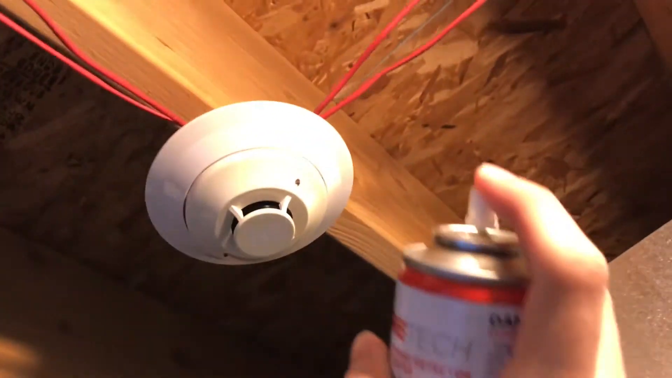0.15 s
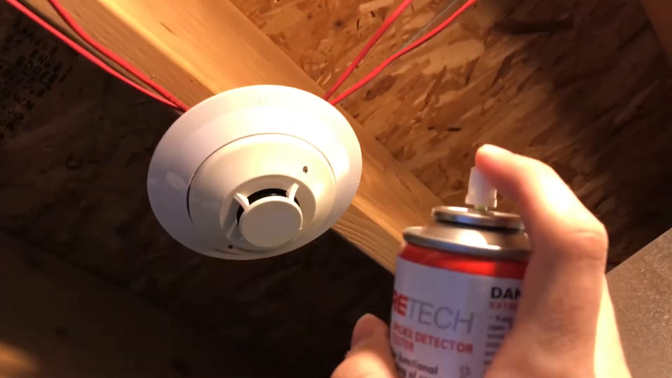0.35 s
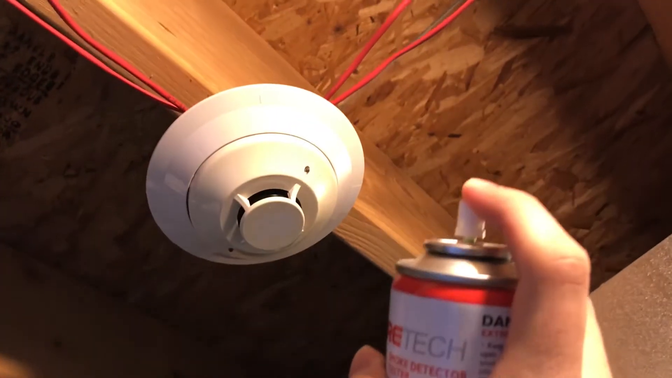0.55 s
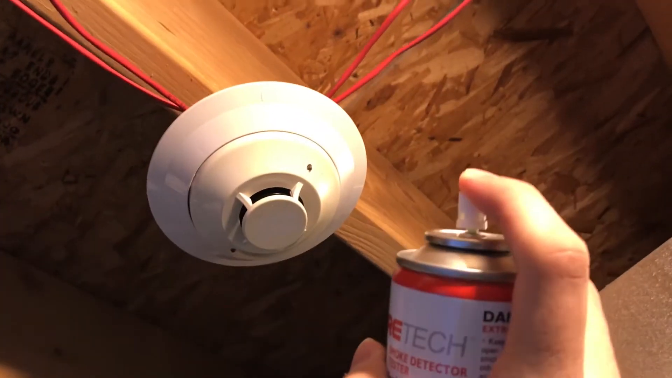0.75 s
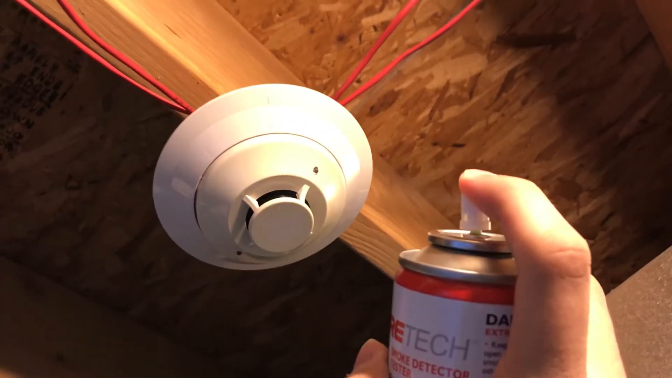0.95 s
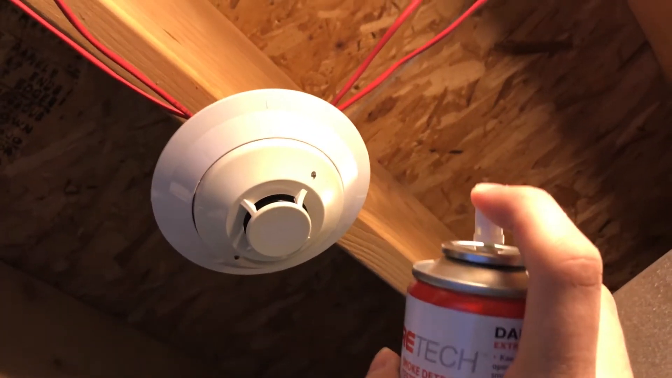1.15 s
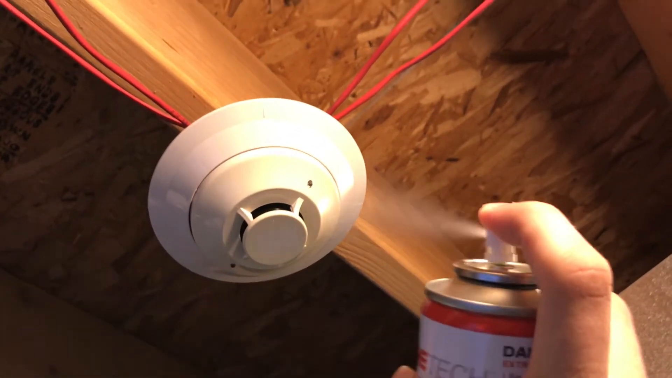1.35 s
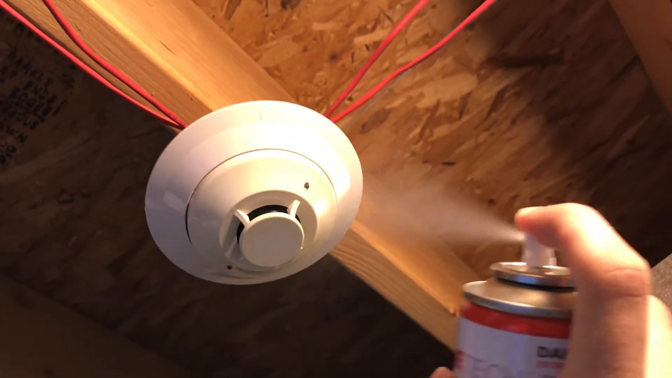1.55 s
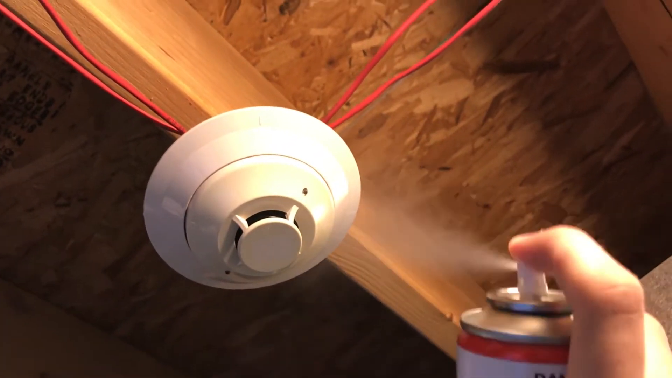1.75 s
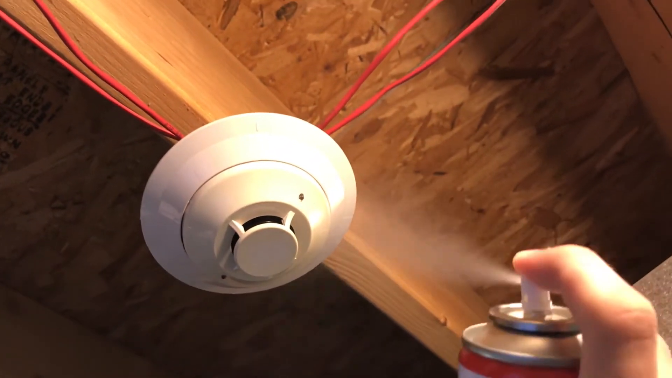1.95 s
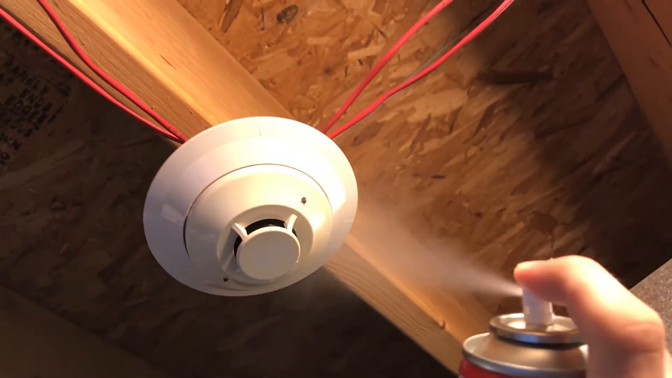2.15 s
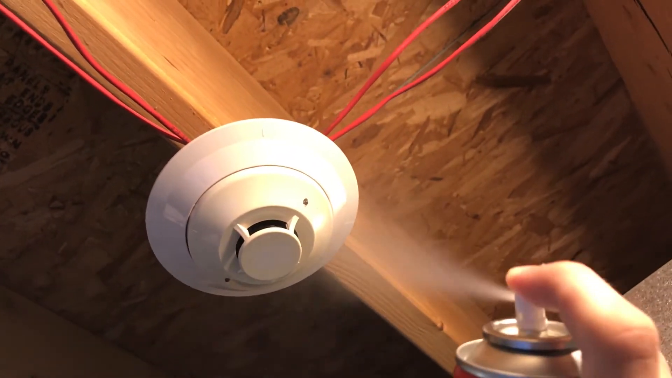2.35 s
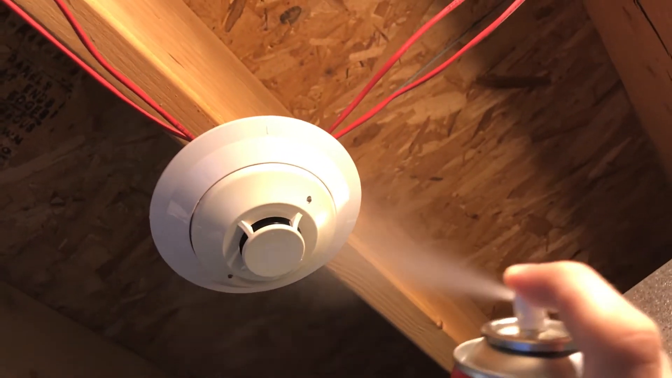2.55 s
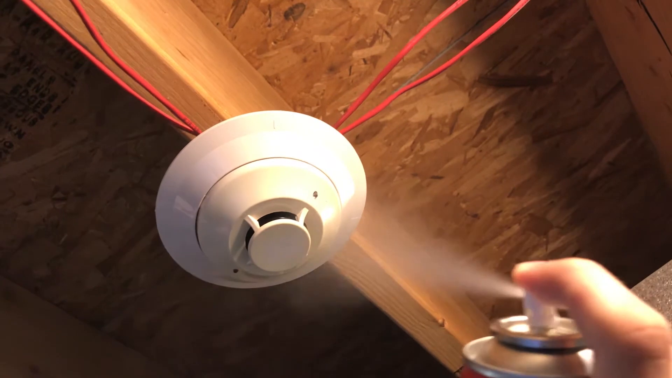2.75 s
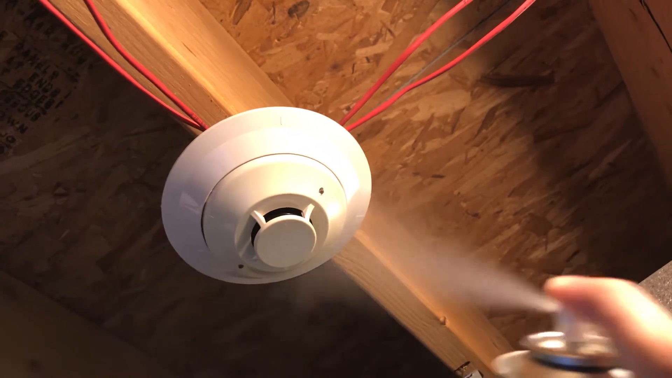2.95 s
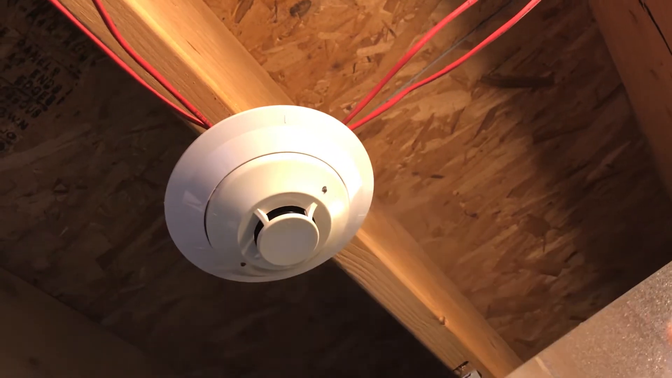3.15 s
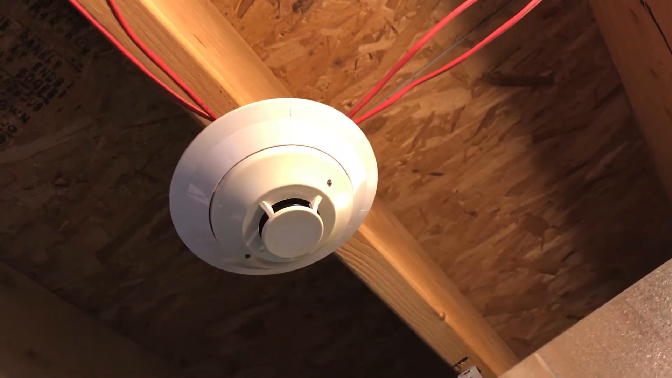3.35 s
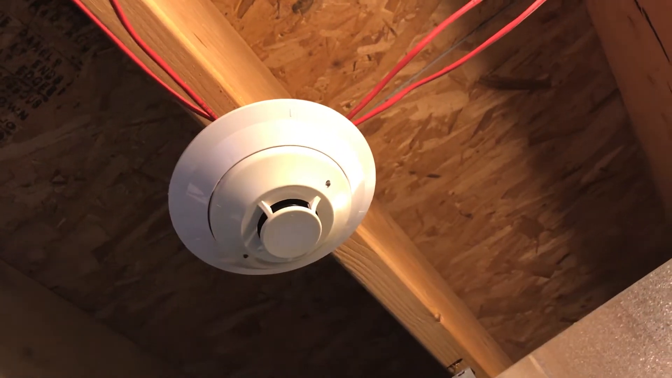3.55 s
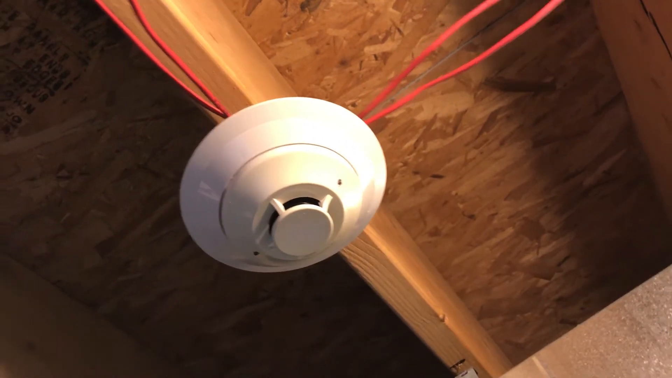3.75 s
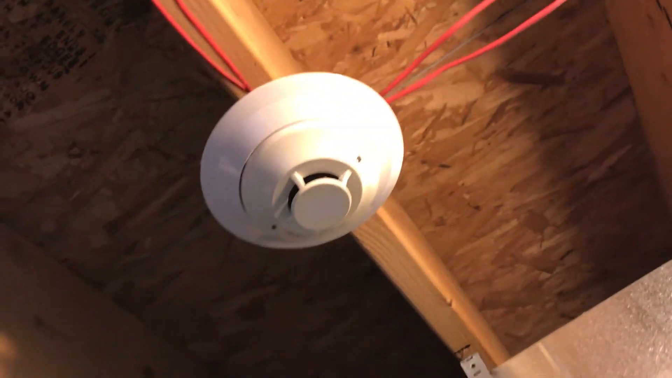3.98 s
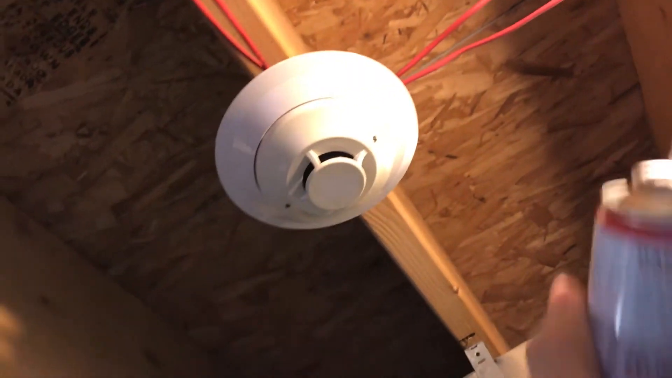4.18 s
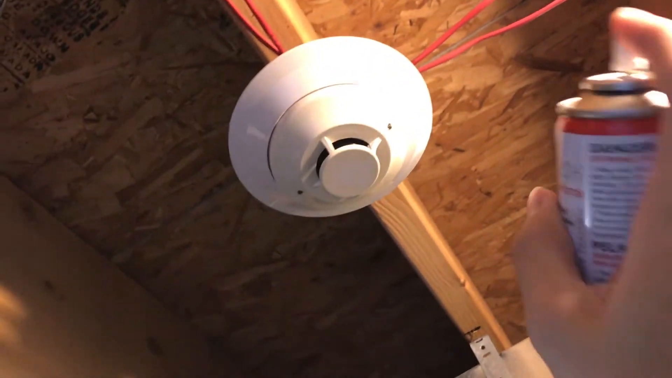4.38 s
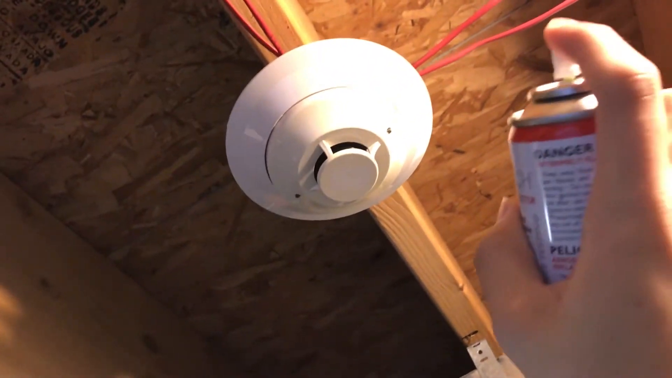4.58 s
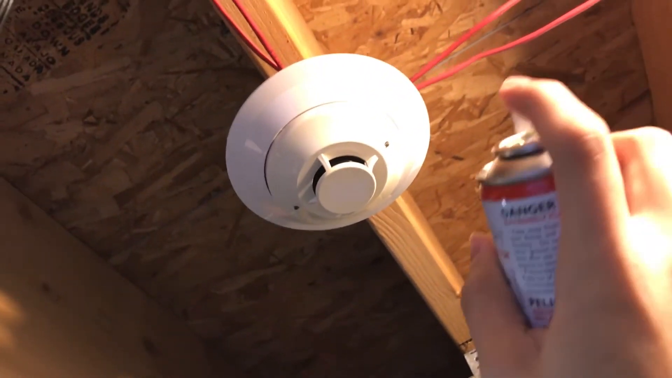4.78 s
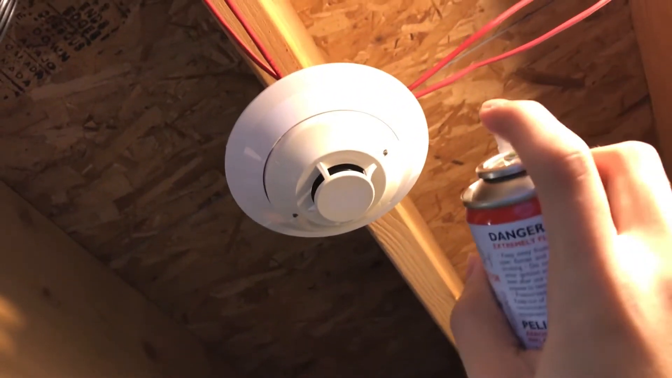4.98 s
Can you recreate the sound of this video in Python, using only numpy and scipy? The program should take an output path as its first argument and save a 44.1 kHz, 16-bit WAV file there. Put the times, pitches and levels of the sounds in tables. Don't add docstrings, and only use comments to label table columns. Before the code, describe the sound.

In a small wooden room, an aerosol can close to the microphone seeps weakly, then hisses firmly and is pumped in quick, even bursts. The spraying stops just after three seconds, leaving a faint rustle and a few light finger ticks on the can. A steady low mains hum, motor drone and soft ventilation continue underneath throughout.

```python
import sys
import numpy as np
from scipy import signal
from scipy.fft import rfft, irfft, next_fast_len
from scipy.io import wavfile
from scipy.ndimage import uniform_filter1d

SR = 44100
rng = np.random.default_rng(int(sys.argv[2]) if len(sys.argv) > 2 else 0)


def boost_factor(decibels):
    exponent = np.asarray(decibels, float) / 20
    return 10 ** exponent


def int16_out(signal):
    q = np.round(np.clip(np.atleast_2d(signal).T, -1, 1) * 32767)
    wavfile.write(sys.argv[1], SR, q.astype(np.int16))


N = 221470

# frequency in Hz, width in Hz, level in dB.
DRONES = [(59.7, 0.41, -54.5), (101.7, 1, -44.5), (320.2, 9.1, -54), (546.6, 9.4, -60.5), (599, 10, -69),
          (713, 15, -64.5), (820, 34, -61)]
# frequency in Hz, density in dB per Hz.
RUMBLE = [(25, -16), (45, -18), (70, -12), (85, -3), (115, -5), (128, 2), (160, -2.5), (190, -13.5),
          (240, -8), (290, -14.5), (340, -11), (420, -18.5), (600, -19.5), (760, -28)]
# frequency in Hz, density in dB per Hz.
AIR = [(450, -25), (760, -10.5), (880, -5.5), (1100, -6), (1170, -9.5), (1580, -9.5), (2260, -14),
       (4830, -23), (7000, -26.5), (7800, -30), (10500, -34), (11600, -32), (13500, -36.5), (16200, -38)]
# frequency in Hz, t60 in seconds.
ROOM_DECAY = [(500, 0.15), (3000, 0.54), (8000, 0.31), (13500, 0.43), (16000, .15)]
# delay in seconds, level in dB.
BOARD_ECHOES = [(.0013, -15), (.0029, -18.5), (.0044, -25.5), (.0067, -20.5), (.0093, -28.5), (0.012, -21)]
# frequency in Hz, density in dB per Hz.
SEEP_COLOUR = [(2500, -11), (4000, 0.5), (6240, -2), (7670, -4.5), (9200, -1), (10500, -7.5), (12100, -1.5),
               (14000, -6), (16200, -8)]
# start in seconds, length in seconds, level in dB, fade in dB per second.
RUSTLES = [(0.07, .17, -67.5, 500), (0.323, .12, -60.5, 400), (3.178, .293, -59, 1200),
           (3.636, 0.014, -61, 140), (3.802, 0.012, -58, 500), (3.844, .095, -68, 120),
           (4.16, .006, -71, 900), (4.478, .005, -65, 500), (4.76, .004, -76, 60)]
# start in seconds, peak in dB, centre in Hz, width in Hz, t60 in seconds.
TICKS = [(3.436, -57, 6000, 4000, .03), (3.5954, -57, 13500, 4000, .01), (3.6406, -52, 6500, 6000, .02),
         (3.8028, -46, 6500, 8000, .012), (3.8095, -44, 8900, 2000, .015), (3.9374, -52, 11600, 2000, .015),
         (3.9374, -54, 6500, 2500, .015), (4.4777, -43, 2800, 600, .04), (4.4777, -55, 8000, 8000, .02),
         (4.7594, -60, 13000, 4000, .04)]
# start in seconds, length in seconds, first Hz, last Hz, level in dB.
SQUEAK = (3.275, .022, 15000, 13600, -65)
# time in seconds, jet level in dB.
SQUEEZES = [
    [(0.83, -75), (0.85, -53), (0.885, -47), (0.94, -44.5), (0.976, -38.5), (1.108, -44.5), (1.26, -34.5),
     (1.306, -43.5), (1.35, -55)],
    [(1.408, -36), (1.448, -25.5), (1.55, -31), (1.652, -26), (1.70, -27.5), (1.734, -32.5), (1.765, -42.5)],
]
# push, let go and back up in seconds, full level in dB, leak left after it in dB.
PUMPS = [(1.773, 1.909, 1.956, -27, -44.5), (1.995, 2.103, 2.16, -27, -34),
         (2.184, 2.304, 2.375, -26.5, -38.5), (2.382, 2.516, 2.562, -26.5, -40),
         (2.584, 2.71, 2.752, -26, -38.5), (2.754, 2.882, 2.934, -26, -47),
         (2.937, 3.043, 3.114, -26.5, -50)]
# frequency in Hz, density in dB per Hz.
FIZZ_SOFT = [(2000, -27), (3000, -12.5), (4270, -11.5), (6000, -5), (7030, -5), (7590, -9), (8780, -8),
             (10300, -10), (11600, -1), (13000, -1.5), (13700, -7), (14300, 3), (16200, -0.5)]
# frequency in Hz, density in dB per Hz.
FIZZ_FULL = [(2000, -27), (3000, -7.5), (4400, -9.5), (5330, -3), (6200, -2), (7640, -6.5), (8840, -4.5),
             (9700, -8.5), (10400, -12.5), (11300, -4.5), (13500, -4), (14200, -1), (15000, 3),
             (16200, -3.5)]
# frequency in Hz, density in dB per Hz.
ROAR = [(260, -33), (450, -7.5), (513, -8), (613, -8.5), (774, -10.5), (1200, -2), (1830, -5), (2120, -2),
        (2490, -4.5), (2810, 0), (4200, -6.5), (5460, -19), (9240, -120)]
# frequency in Hz, width in Hz, level in dB.
WHISTLES = [(8600, 300, -13), (9600, 200, -16), (11800, 400, -15), (12800, 300, -14), (14400, 300, -16)]
# centre in seconds, lower Hz, upper Hz.
SIDE_BURSTS = [(.032, 5120, 8310), (.032, 12360, 14450), (.241, 4610, 5750), (.7982, 8230, 9650),
               (2.2611, 6830, 9690), (2.4701, 10940, 12450), (2.8648, 4110, 5120), (2.8648, 7520, 10360),
               (3.9097, 12300, 13800), (3.9561, 10230, 14530), (4.1187, 14380, 15750), (4.2812, 5620, 6910),
               (4.3973, 10960, 12490), (4.8153, 4690, 5750), (4.8385, 6830, 8350)]

SOFT_DB, FULL_DB = -38.5, -27


def evened(x):
    return x / np.sqrt(np.mean(x ** 2) + 1e-20)


def read(points, hz):
    f, value = np.transpose(points)
    return np.interp(np.log(hz + 1), np.log(f + 1), value)


def band(x, lo_hz, hi_hz):
    size = next_fast_len(len(x))
    hz = np.fft.rfftfreq(size, 1 / SR)
    return irfft(rfft(x, size) * ((hz >= lo_hz) & (hz < hi_hz)), size)[:len(x)]


def hiss(colour, patchy_db=1.0, size=512):
    hz = np.fft.rfftfreq(size, 1 / SR)
    frames = 4 * N // size + 8
    a, b, patches = rng.standard_normal((3, frames, len(hz)))
    patches = uniform_filter1d(patches, size=14, axis=0)
    patches = evened(uniform_filter1d(patches, size=6, axis=1))
    inside = (hz >= colour[0][0]) & (hz <= colour[-1][0])
    z = (a + 1j * b) * boost_factor(read(colour, hz) + patchy_db * patches) * inside
    return evened(signal.istft(z.T, nperseg=size, noverlap=3 * size // 4)[1][:N])


def fuzzy_tone(hz, width):
    r = np.exp(-np.pi * width / SR)
    noise = [1, 1j] @ rng.standard_normal((2, N + SR))
    slow = signal.lfilter([1], np.convolve([1, -r], [1, -r]), noise)[SR:]
    return evened((slow * np.exp(2j * np.pi * hz * np.arange(N) / SR)).real)


def mains_hum(t):
    level_db = -33 + 0.66 * fuzzy_tone(0, 2.3)
    return np.sqrt(2) * boost_factor(level_db) * np.sin(2 * np.pi * 120.06 * t)


def motor(t):
    drones = sum(boost_factor(db) * fuzzy_tone(hz, width) for hz, width, db in DRONES)
    whine_db = -55.5 + 1.6 * (t - t[-1])
    phase = 2 * np.pi * 855 * t + 0.8 * fuzzy_tone(0, 1.5)
    return drones + np.sqrt(2) * boost_factor(whine_db) * np.sin(phase)


def ventilation():
    rumble = boost_factor(-39) * hiss(RUMBLE, patchy_db=1.5, size=4096)
    return rumble + boost_factor(-51) * hiss(AIR, size=1024)


def room(x):
    taps = np.zeros(SR // 2)
    at = np.arange(200, SR // 2 - 20, 20)
    taps[at + rng.integers(0, 20, len(at))] = rng.choice([-1., 1.], len(at))
    hz, t, z = signal.stft(taps, SR, nperseg=256)
    t60 = np.maximum(read(ROOM_DECAY, hz), 0.05)
    tail = signal.istft(z * boost_factor(-60 * t / t60[:, None]), SR, nperseg=256)[1]
    return signal.fftconvolve(x, tail / np.linalg.norm(tail))[:N]


def boards(x):
    n, echoes = np.arange(N), np.zeros(N)
    for s, db in BOARD_ECHOES:
        delay = np.round(s * SR + 4 * fuzzy_tone(0, 0.6)).astype(int)
        echoes += boost_factor(db) * x[np.clip(n - delay, 0, N - 1)]
    return echoes


def rustling(t):
    level = boost_factor(-82)
    for s, length, db, fade in RUSTLES:
        rise_db = 1300 * np.maximum(s - t, 0)
        fade_db = fade * np.maximum(t - s - length, 0)
        level = level + boost_factor(db - rise_db - fade_db)
    return level


def ticks():
    out, u = np.zeros(N), np.arange(1500) / SR
    for s, db, hz, width, t60 in TICKS:
        grit = evened(band(rng.standard_normal(1500), hz - width / 2, hz + width / 2))
        out[round(s * SR):][:1500] += grit * boost_factor(db - 6 - 60 * u / t60)
    return out


def squeak(t):
    s, length, from_hz, to_hz, db = SQUEAK
    part = np.clip((t - s) / length, 0, 1)
    phase = 2 * np.pi * np.cumsum(from_hz + (to_hz - from_hz) * part) / SR
    return boost_factor(db) * np.sin(np.pi * part) * np.sin(phase)


def hand(t):
    return rustling(t) * hiss(SEEP_COLOUR, patchy_db=0.5) + ticks() + squeak(t)


def valve(t):
    knots = SQUEEZES[0] + SQUEEZES[1]
    for push, let_go, up, full_db, leak_db in PUMPS:
        slow = 1 + 1.3 * np.exp((PUMPS[0][0] - push) / 0.19)
        knots = knots + [
            (push, knots[-1][1]),
            (push + slow * 0.007, full_db - 3.5),
            (push + slow * 0.022, full_db),
            (let_go, full_db),
            (let_go + 0.32 * (up - let_go), full_db - 4.5),
            (up, leak_db)]
    knots = knots + [(up + 0.135, leak_db - 22)]
    flowing = (t > knots[0][0]) & (t < knots[-1][0])
    return np.where(flowing, np.interp(t, *np.transpose(knots)), -200)


def roar(t, sag_db):
    firm = np.clip((t - 1.42) / 0.022, 0, 1)
    gas_db = -11.5
    liquid_db = -5 + 0.81 * sag_db - 1.55 * np.maximum(sag_db - 4.5, 0)
    return boost_factor(gas_db + firm * (liquid_db - gas_db)) * hiss(ROAR, patchy_db=0.8)


def nozzle_whistles(t):
    top_s = 1.23
    level_db = 7 - np.maximum(26 * (top_s - t), 21 * (t - top_s))
    return boost_factor(level_db) * sum(boost_factor(db) * fuzzy_tone(hz, width) for hz, width, db in WHISTLES)


def fizz_and_sizzle(t, level_db, sag_db):
    sizzle_db = 2 + 0.9 * np.maximum(t - 1.42, 0)
    sizzle_db += 0.11 * np.minimum(sag_db, 15)
    sizzle_db += 1.0 * fuzzy_tone(0, 40)
    sizzle_db -= 40 * np.maximum(t - PUMPS[-1][2], 0)
    wide = np.clip((level_db - SOFT_DB) / (FULL_DB - SOFT_DB), 0, 1)
    out = np.zeros(N)
    for share, colour, patchy_db in [(1 - wide, FIZZ_SOFT, 1.0), (wide, FIZZ_FULL, 0.8)]:
        x = hiss(colour, patchy_db)
        fizz = band(x, 0, 10400)
        out += np.sqrt(share) * (evened(fizz) + boost_factor(sizzle_db) * evened(x - fizz))
    return out


def spray(t):
    level_db = valve(t)
    sag_db = np.clip(FULL_DB - level_db, 0, 30)
    jet = roar(t, sag_db) + nozzle_whistles(t) + fizz_and_sizzle(t, level_db, sag_db)
    sputter = evened(uniform_filter1d(rng.standard_normal(N), size=300))
    flutter = fuzzy_tone(0, 40)
    return boost_factor(level_db + 0.5 * sputter + 0.6 * flutter) * jet


def scene():
    t = np.arange(N) / SR
    machines = mains_hum(t) + motor(t) + ventilation()
    can = hand(t) + spray(t)
    return np.tile(can + boards(can) + boost_factor(-28.5) * room(can) + machines, (2, 1))


def top_cut(x):
    return signal.sosfilt(signal.butter(12, 16750, fs=SR, output="sos"), x)


def record(dry):
    power_db = 10 * np.log10(uniform_filter1d(dry[0] ** 2, size=8000) + 1e-12)
    ducked = dry[0] / boost_factor(0.15 * np.maximum(power_db + 26.0, 0))
    low_pass = signal.firwin(2047, 15790, window=("kaiser", 11), fs=SR)
    mid = signal.oaconvolve(ducked, low_pass, "same")
    side = np.zeros(N)
    window = signal.windows.kaiser_bessel_derived(2048, 4 * np.pi)
    for s, lo_hz, hi_hz in SIDE_BURSTS:
        frame = slice(round(s * SR) - 1024, round(s * SR) + 1024)
        noise = evened(band(rng.standard_normal(2048), lo_hz, hi_hz))
        side[frame] += boost_factor(-4.5) * window * np.std(band(mid[frame], lo_hz, hi_hz)) * noise
    return top_cut(np.array([mid + side, mid - side]))


dry = scene()
out = record(dry)
int16_out(out)
```